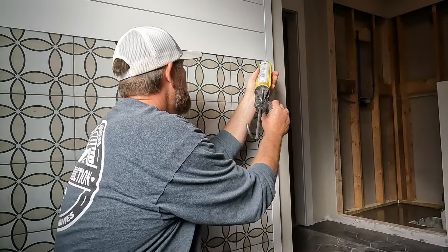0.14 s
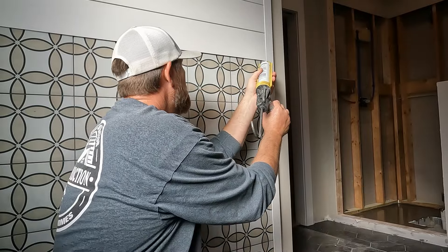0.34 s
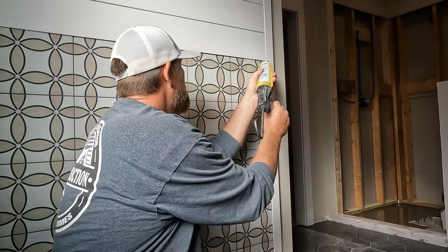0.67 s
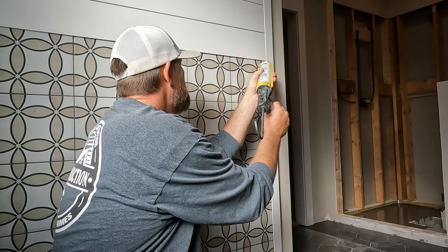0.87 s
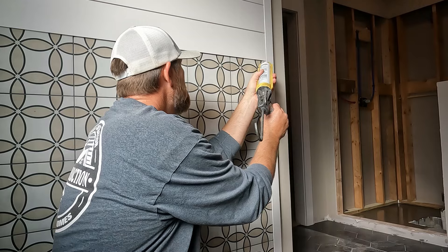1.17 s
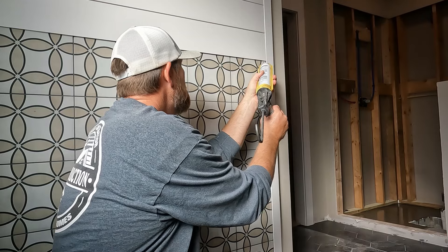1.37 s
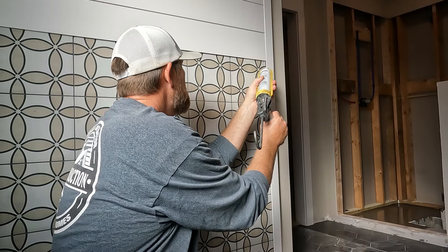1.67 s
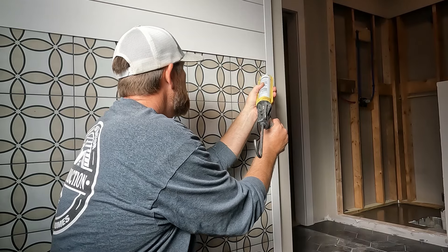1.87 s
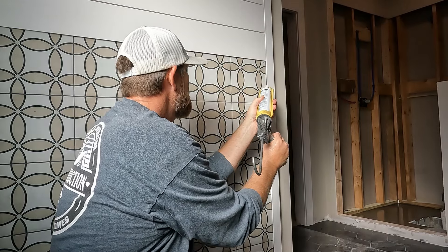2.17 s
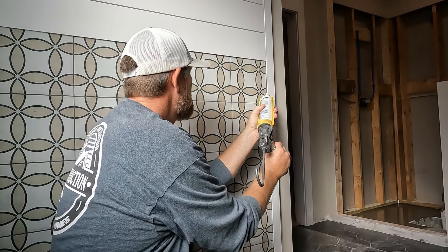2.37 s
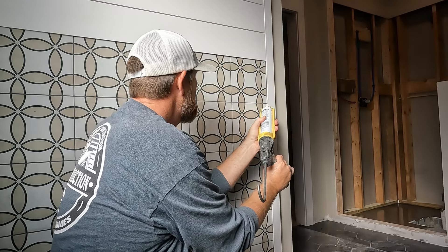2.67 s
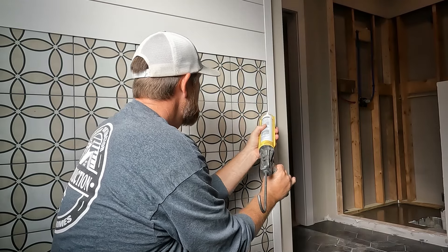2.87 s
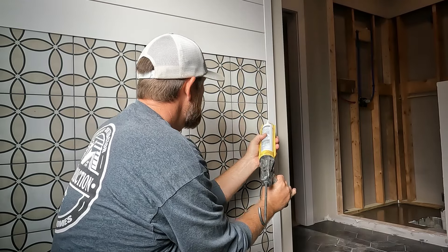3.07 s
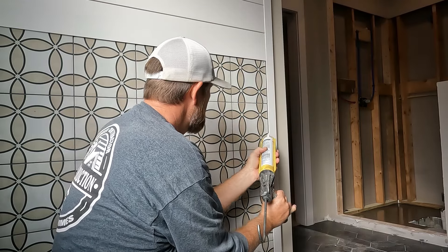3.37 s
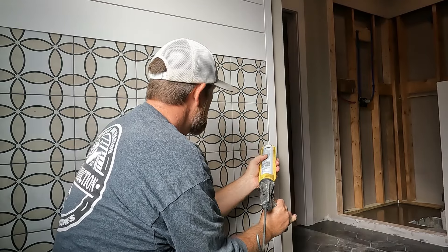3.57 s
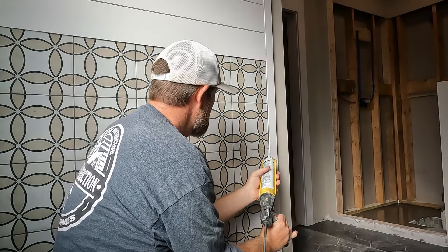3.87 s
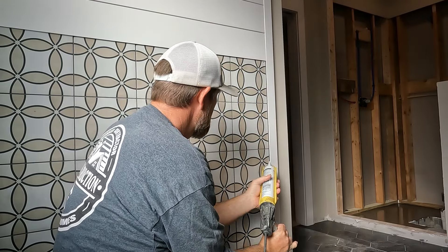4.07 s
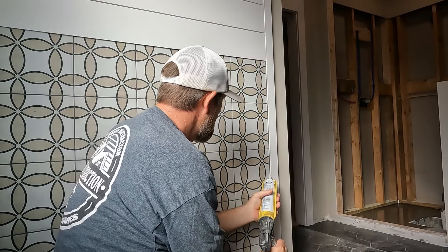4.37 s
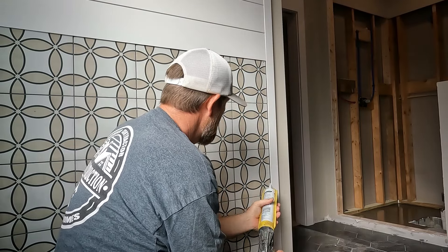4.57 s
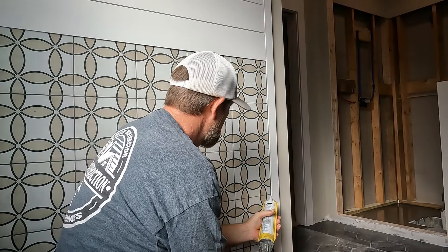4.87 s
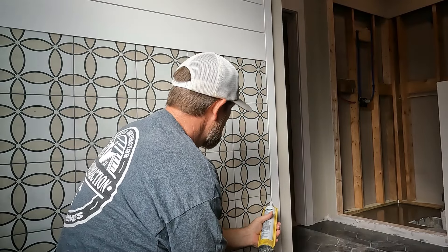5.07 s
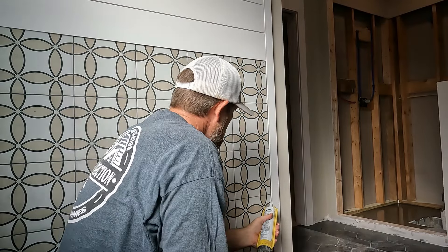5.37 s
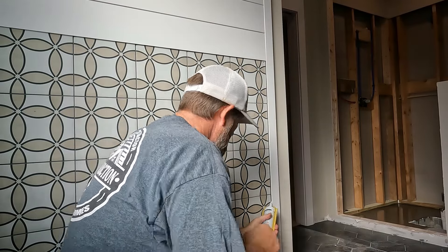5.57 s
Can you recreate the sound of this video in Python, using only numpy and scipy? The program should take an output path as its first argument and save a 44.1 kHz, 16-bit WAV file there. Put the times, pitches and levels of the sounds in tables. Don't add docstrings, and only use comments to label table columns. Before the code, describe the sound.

A hand caulking gun ticks lightly in a bare, echoing room, snaps twice, then its release lever slams with a loud metallic clack at the end.

```python
import sys
import numpy as np
from scipy import signal
from scipy.fft import rfft, irfft
from scipy.io import wavfile
from scipy.ndimage import uniform_filter1d

SR = 44100
rng = np.random.default_rng(int(sys.argv[2]) if len(sys.argv) > 2 else 0)


def generate_wav(signal):
    frames = np.transpose(np.atleast_2d(signal))
    scaled = np.clip(frames, -1, 1) * 32767
    pcm = np.round(scaled).astype(np.int16)
    wavfile.write(sys.argv[1], SR, pcm)


def natural_amplitude(level_db):
    exponent = np.asarray(level_db, float) / 20
    return 10 ** exponent


N = 252252
T = np.arange(N) / SR


def unit(x):
    return x / np.sqrt(np.mean(x ** 2))


def peak(x, db):
    return natural_amplitude(db) * x / np.abs(x).max()


def add(track, s, piece):
    i = int(round(s * SR))
    track[i:i + len(piece)] += piece[:N - i]


def band(x, hz, width_hz):
    return signal.lfilter(*signal.iirpeak(hz, hz / width_hz, fs=SR), x)


def band_twice(x, hz, width_hz, second_width_hz):
    return band(band(x, hz, width_hz), hz, second_width_hz)


def gain_curve(points, size):
    hz, db = np.transpose(points)
    bin_hz = np.arange(size // 2 + 1) * SR / size
    return natural_amplitude(np.interp(np.log(bin_hz + 1), np.log(hz), db))


def noise(points):
    spectrum = rfft(rng.standard_normal(N))
    return unit(irfft(spectrum * gain_curve(points, N), N))


def response(points, size=1024):
    cepstrum = irfft(np.log(gain_curve(points, size)), size)
    cepstrum[1:size // 2] *= 2
    cepstrum[size // 2 + 1:] = 0
    return irfft(np.exp(rfft(cepstrum)), size)


def walk(rate_hz):
    hold = int(SR / rate_hz)
    steps = np.repeat(rng.standard_normal(N // hold + 1), hold)
    return 1.286 * uniform_filter1d(steps, hold)[:N]


def singing(hz, width_hz, level_db):
    tone = unit(band_twice(rng.standard_normal(N), hz, width_hz, width_hz))
    return natural_amplitude(level_db + 1.5 * walk(4.16)) * tone


def contact(ms, size=4096):
    force = np.zeros(size)
    force[0] = 1
    for share in np.array([.04, .08, .13, .2]) * rng.uniform(.8, 1.2, size=4):
        lag = max(int(share * ms * SR / 1000), 1)
        taps = np.zeros(lag + 1)
        taps[0], taps[-1] = 1, rng.choice([-.68, .68])
        force = signal.lfilter(taps[::-1], taps, force)
    return force


# (frequency [Hz], density [dB per Hz])
AIR_COLOUR = [(12, -29), (20, -1.5), (104, -2), (165, -8), (228, -6), (301, -5), (897, -14.5), (1330, -14),
              (1530, -16.5), (1710, -11.5), (2260, -20), (2600, -17.5), (3840, -22), (4180, -21),
              (4810, -27), (16000, -38.5)]
AIR_DB = -63.5


def room_air():
    return natural_amplitude(AIR_DB + 1.63 + .5 * walk(7.1)) * noise(AIR_COLOUR)


# (frequency [Hz], width [Hz], level [dB])
FAN_LINES = [(120, 7.7, -76.5), (258.8, 14.5, -75.5), (447.7, 6.8, -76.5), (1335.6, 48, -73.5),
             (1761, 64, -79), (2086, 10, -82)]
MAINS_HZ, MAINS_DB = 120, -68.5


def fan_hum():
    phase = 2 * np.pi * np.cumsum(MAINS_HZ + 1.27 * walk(6.4)) / SR
    out = natural_amplitude(MAINS_DB + 1.2 * walk(5.6)) * np.sin(phase)
    for hz, width_hz, db in FAN_LINES:
        out += singing(hz, width_hz, db)
    return out


# (time [s], level [dB])
DRAG = [(0.0, -66.5), (0.39, -77.5), (1.12, -75.5), (1.36, -71), (2.19, -63.5), (2.6, -65.5), (3.4, -68),
        (3.85, -67), (4.3, -67.5), (4.7, -67.5), (5.15, -71)]
# (frequency [Hz], level [dB])
DRAG_COLOUR = [(1200, -24), (2500, 3.5), (4000, 3), (6000, 4.5), (8500, 2), (10000, -6.5), (15000, -6)]
# (frequency [Hz], width [Hz], level [dB])
NOZZLE_LINES = [
    [(4220, 13, 0), (4312, 16, -7), (4570, 14, -8), (4130, 14, -8)],
    [(3740, 300, 3), (5800, 260, -1)],
]
WHINE_START_S, WHINE_RISE_S, WHINE_END_S, WHINE_FALL_S, WHINE_DB = 0.018, 0.083, 1.09, 0.41, -72.5
THROAT_DB, THROAT_DB_PER_S = -15.5, 1.5


def nozzle_drag():
    hiss_db = np.interp(T, *np.transpose(DRAG))
    out = natural_amplitude(hiss_db + 0.5 + 1.1 * walk(3)) * noise(DRAG_COLOUR)
    rise = (T - WHINE_START_S) / WHINE_RISE_S
    fall = 1 + (WHINE_END_S - T) / WHINE_FALL_S
    whine_db = WHINE_DB + 20 * np.log10(np.clip(np.minimum(rise, fall), 1e-3, 1))
    throat_db = hiss_db + THROAT_DB + THROAT_DB_PER_S * T
    for lines, level_db in zip(NOZZLE_LINES, [whine_db, throat_db]):
        for hz, width_hz, db in lines:
            out += singing(hz, width_hz, db + level_db - 1)
    return out


# (frequency [Hz], T60 [s])
ROOM_T60 = [(60, 0.78), (300, 0.57), (600, 0.85), (1000, 0.96), (1550, 0.95), (2100, 0.72), (3500, 0.82),
            (6000, 0.7), (9000, 0.54), (14000, 0.56)]
ROOM_DB, ROOM_FILL_MS, EARLY_GAIN, EARLY_MS = 2.9, 5.0, .4, 25


def room():
    t, tail = T[:SR], 0
    hz, t60_s = np.transpose(ROOM_T60)
    for f in 30 * 2 ** (np.arange(28) / 3):
        life_s = np.interp(np.log(f), np.log(hz), t60_s)
        hiss = band_twice(rng.standard_normal(SR), f, f / 3, f / 3)
        tail = tail + hiss * np.exp(-np.log(1000) * t / life_s)
    tail = tail * (1 - np.exp(-t / (ROOM_FILL_MS / 1000)))
    tail = tail * (1 + EARLY_GAIN * np.exp(-t / (EARLY_MS / 1000)))
    return natural_amplitude(ROOM_DB) * tail / np.sqrt(np.sum(tail ** 2))


# (delay [ms], level [dB])
ECHOES = [(2.8, -8), (3.6, -11), (5.3, -14), (7.3, -12), (10.8, -14), (12.5, -13)]


def room_with_echoes():
    tail = room()
    for ms, db in ECHOES:
        tail[int(ms * SR / 1000)] += natural_amplitude(db) * rng.choice([-1, 1])
    return tail


EARLIER_DB, EARLIER_AGE_S = -12, 0.3


def earlier_ring(tail):
    ring = signal.fftconvolve(tail, peak(response(RELEASE_COLOUR), EARLIER_DB))
    return ring[int(EARLIER_AGE_S * SR):]


def push(ms, size=16384):
    t = T[:size]
    rough = (1 + 0.69 * rng.standard_normal(size)) * rng.choice([-1, 1], size)
    return rough * (1 - np.exp(-t / 0.0014)) * np.exp(-t / (ms / 1000))


# (time [s], level [dB], length [ms])
JOISTS = [
    (0.019, -50, 72),
    (2.691, -53, 110),
    (3.801, -54, 28),
    (4.873, -52.5, 31),
    (5.228, -52, 43),
]
JOIST_HZ = 30.8


def joists():
    out = np.zeros(N)
    for s, db, ms in JOISTS:
        add(out, s, peak(band_twice(push(ms), JOIST_HZ, 33, 54), db))
    return out


# (time [s], board level [dB], board [Hz], knock level [dB], knock [Hz])
THUDS = [(.0, -59, 142, -53.5, 898), (0.346, -48.5, 187, -61, 895), (0.391, -46, 261, -54, 1250),
         (.425, -53, 192, -65, 930), (2.692, -56, 120, -49, 996), (3.7938, -50.5, 204, -39.5, 1030),
         (3.832, -53, 121, -45.5, 967), (4.869, -55, 232, -60, 707), (5.223, -46, 116.6, -46.5, 490)]
# (time [s], level [dB], frequency [Hz])
SETTLE = [(.084, -56, 287), (.482, -47, 269), (.516, -57, 264), (.59, -59, 300), (.635, -54, 284),
          (.70, -59.5, 300), (.79, -58, 287), (1.879, -59, 272)]
OVERTONE, OVERTONE_DB = 1.83, -19
# (share of knock Hz, width [share of knock Hz], level [dB])
KNOCK = [(0.978, 0.1, 3.5), (0.653, 0.035, -0.5), (0.835, 0.18, 5.5), (1.25, 0.072, -9)]
HARD_MS, SOFT_MS, HARD_DB, MS_PER_DB = 4, 24, -44, 1.25


def thuds():
    out = np.zeros(N)
    settling = [(s, db, hz, db + OVERTONE_DB, OVERTONE * hz) for s, db, hz in SETTLE]
    for s, board_db, board_hz, knock_db, knock_hz in THUDS + settling:
        ms = np.clip(HARD_MS + MS_PER_DB * (HARD_DB - knock_db), HARD_MS, SOFT_MS)
        force = contact(2 * ms, size=16384)
        board = band_twice(force, board_hz, 0.12 * board_hz, 2.1 * board_hz)
        knock = 0
        for share, width, db in KNOCK:
            hz, width_hz = share * knock_hz, width * knock_hz
            knock = knock + natural_amplitude(db) * unit(band_twice(force, hz, width_hz, 3 * width_hz))
        add(out, s, peak(board, board_db) + peak(knock, knock_db))
    return out


TUBE_WIDTH_HZ = 105
RATTLE_HZ = 4010


def blows(table, colour, contact_ms):
    out = np.zeros(N)
    for (s, db, tilt_db, ring_db, ring_hz), ms in zip(table, contact_ms):
        tilted = [(hz, level + tilt_db * np.log2(hz / 4000)) for hz, level in colour]
        crack = signal.fftconvolve(contact(ms), response(tilted))
        rattle = contact(ms * (RATTLE_HZ / ring_hz) ** 2)
        ring = band_twice(rattle, ring_hz, TUBE_WIDTH_HZ, 8.1 * TUBE_WIDTH_HZ)
        add(out, s, peak(crack, db))
        add(out, s, peak(ring, db + ring_db))
    return out


# (time [s], blow [dB], tilt [dB per octave], ring re blow [dB], ring [Hz])
TICKS = [(1.0130, -38.5, -2, -10.5, 1498), (1.3076, -42, 2, -17, 4440), (1.5196, -36, 2, -11, 1514),
         (1.7824, -37, 2, -10.5, 1476), (2.1642, -39.5, -6.5, -13, 1367), (2.645, -46.5, -13, -3.5, 1433),
         (3.0432, -41, -6, -12, 4040), (3.046, -57, -9, 3, 1463), (3.25, -53, 5, -27, 1500),
         (3.62, -47, -6, -19.5, 5800), (3.791, -39.5, -7.5, -30, 1520), (4.583, -37.5, -7, -15.5, 1615),
         (4.87, -43.5, -3, -28, 1480), (5.194, -39.5, -15.5, -4, 1412)]
# (frequency [Hz], density [dB per Hz])
TICK_COLOUR = [(300, -43), (1100, -47.5), (2000, -5.5), (3500, -1), (5000, 1), (7000, 0), (10000, -5),
               (13500, -10), (15300, -17), (16500, -24.5)]
TICK_MS, TICK_MS_PER_RING_DB, TICK_LONGEST_MS = 4.6, 0.22, 3.4


def ticks():
    ring_db = np.array(TICKS)[:, 3]
    tick_ms = np.clip(TICK_MS + TICK_MS_PER_RING_DB * ring_db, .5, TICK_LONGEST_MS)
    return blows(TICKS, TICK_COLOUR, tick_ms)


# (time [s], blow [dB], tilt [dB per octave], ring re blow [dB], ring [Hz])
FIRST_SNAP = [
    (2.1881, -23.5, .1, -23.5, 1494),
]
# (time [s], blow [dB], tilt [dB per octave], ring re blow [dB], ring [Hz])
SECOND_SNAP = [
    (2.5571, -18, .1, -23, 3200),
]
# (frequency [Hz], density [dB per Hz])
FIRST_COLOUR = [(300, -31), (700, -13.5), (1300, -12.5), (2140, -4), (3000, -3), (3800, -0.5), (4600, -5),
                (5400, -15), (7300, -10), (9500, -23.5), (12000, -33), (14500, -24), (16500, -33.5)]
# (frequency [Hz], density [dB per Hz])
SECOND_COLOUR = [(300, -20), (645, -14), (870, -10.5), (1500, -7.5), (2300, -3), (3200, 1), (3600, -3.5),
                 (4000, -10.5), (6500, -8.5), (8000, -12.5), (10000, -28.5), (13300, -15.5), (16500, -23.5)]
SNAP_MS = .05


def snaps():
    first = blows(FIRST_SNAP, FIRST_COLOUR, [SNAP_MS])
    return first + blows(SECOND_SNAP, SECOND_COLOUR, [SNAP_MS])


# (time [s], blow [dB], tilt [dB per octave], ring re blow [dB], ring [Hz])
RELEASE = [
    (5.21, -49.5, 8, -20, 2000),
    (5.215, -43, 10, -35, 1500),
    (5.218, -18, 5, -9.5, 9310),
    (5.2208, -2.58, 0, -30, 1635),
]
# (frequency [Hz], density [dB per Hz])
RELEASE_COLOUR = [(40, -23), (110, -19), (200, -20), (400, -22.5), (520, -11.5), (800, -13.5),
                  (1300, -16.5), (1500, -4.5), (2000, -7), (2500, -3), (3200, -11), (4100, -8.5),
                  (6000, -13), (10000, -22), (16000, -40)]
# (frequency [Hz], width [Hz], level [dB])
ROD = [(515, 52, -33.5), (617, 33, -31), (1620, 54, -26), (1864, 39, -31), (2350, 81, -25.5),
       (2610, 65, -31), (3950, 80, -25), (5170, 110, -31), (7640, 33, -33), (9480, 40, -36),
       (12500, 130, -30), (15000, 110, -34)]
RELEASE_MS = 2.3


def release():
    out = blows(RELEASE, RELEASE_COLOUR, [RELEASE_MS] * len(RELEASE))
    force = contact(1.5, size=16384)
    ringing = sum(peak(band(force, hz, width_hz), db) for hz, width_hz, db in ROD)
    slam_s = RELEASE[-1][0]
    add(out, slam_s, ringing)
    return out


# (frequency [Hz], level [dB])
CAPSULE_HISS = [(20, 9), (300, 6), (800, 8.5), (1200, -5), (3000, 2.5), (5000, 7.5), (7500, 9), (16000, 14)]
SIDE_DB, SIDE_ROOM_DB = -81.5, -22


def channel_difference(dry):
    room_side = signal.fftconvolve(dry, room())
    coloured = signal.fftconvolve(room_side, unit(response(CAPSULE_HISS)) / 32)[:N]
    return natural_amplitude(SIDE_ROOM_DB) * coloured + natural_amplitude(SIDE_DB) * noise(CAPSULE_HISS)


def scene():
    dry = joists() + thuds() + ticks() + snaps() + release()
    tail = room_with_echoes()
    mid = room_air() + fan_hum() + nozzle_drag()
    mid += dry + signal.fftconvolve(dry, tail)[:N]
    add(mid, 0, earlier_ring(tail))
    side = channel_difference(dry)
    return np.array([mid + side, mid - side])


def roll_off(x):
    return signal.sosfilt(signal.butter(12, 16680, fs=SR, output="sos"), x)


def record(dry):
    top_cut = signal.ellip(10, .2, 70, 15800, fs=SR, output="sos")
    mix = signal.sosfilt(top_cut, dry)
    return roll_off(mix)


dry = scene()
out = record(dry)
generate_wav(out)
```